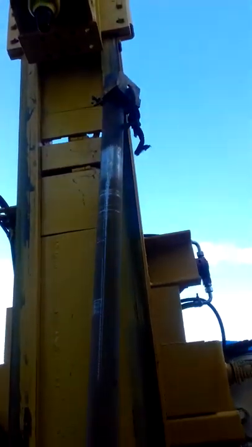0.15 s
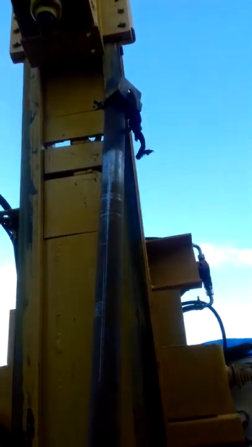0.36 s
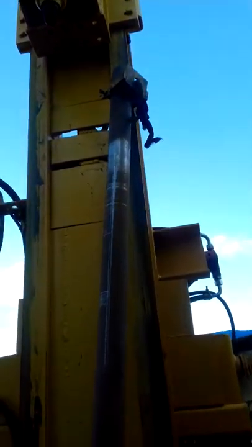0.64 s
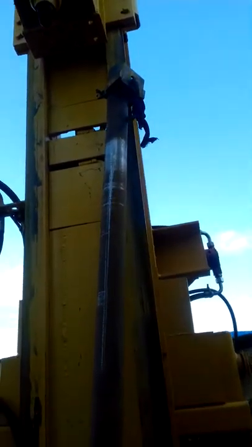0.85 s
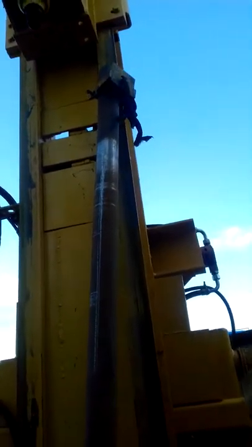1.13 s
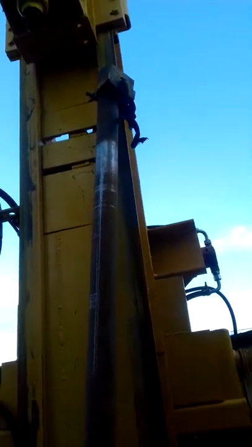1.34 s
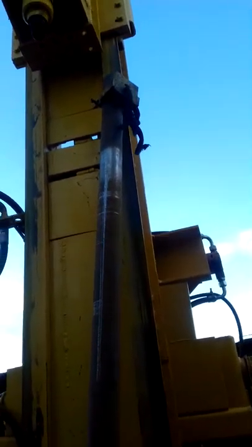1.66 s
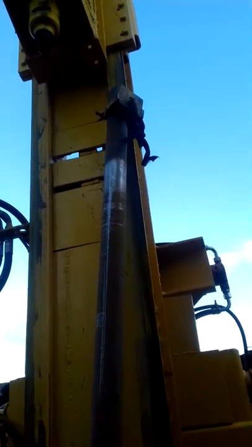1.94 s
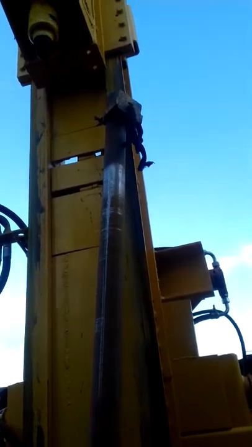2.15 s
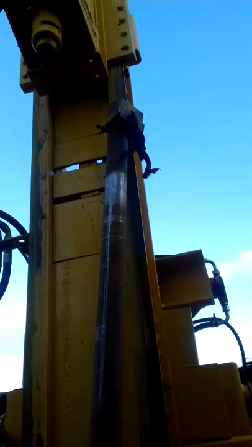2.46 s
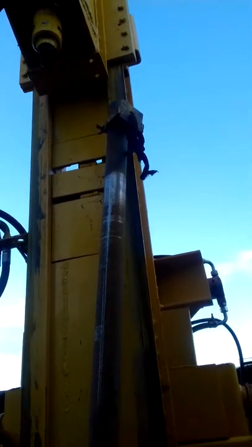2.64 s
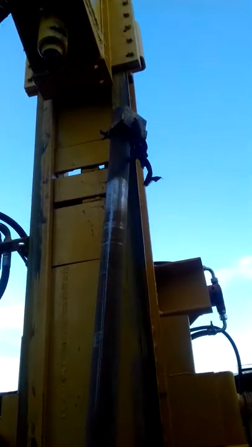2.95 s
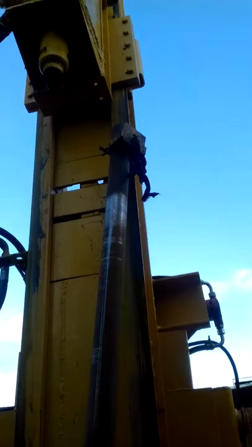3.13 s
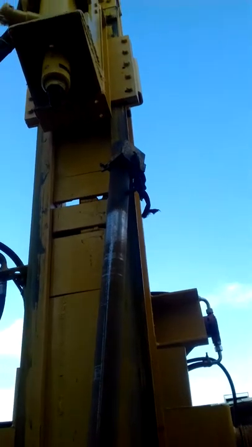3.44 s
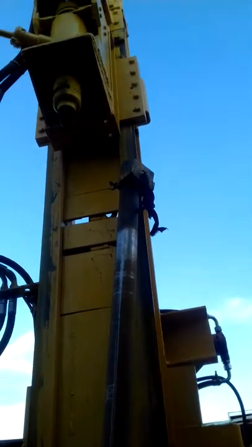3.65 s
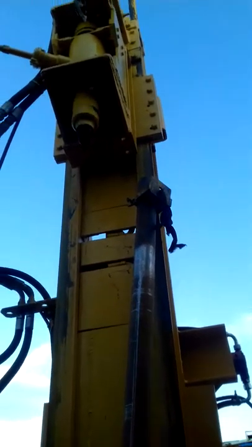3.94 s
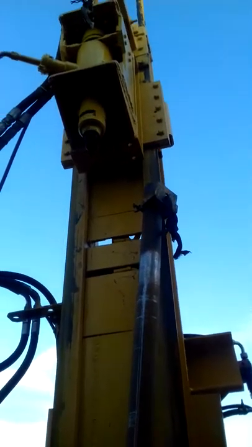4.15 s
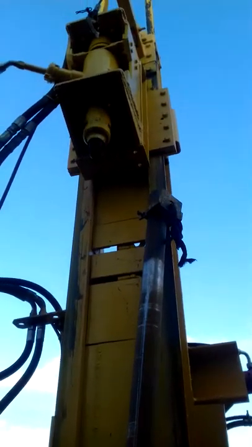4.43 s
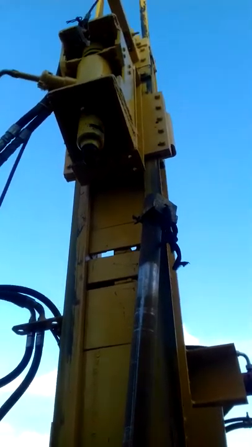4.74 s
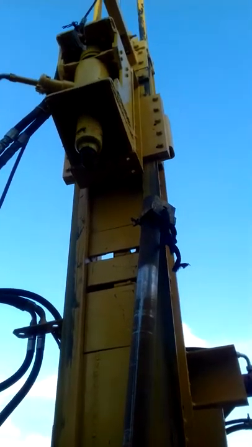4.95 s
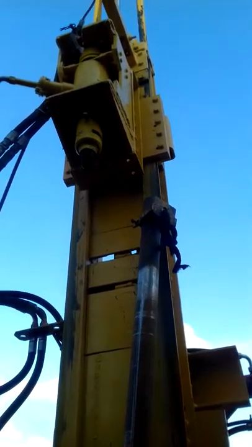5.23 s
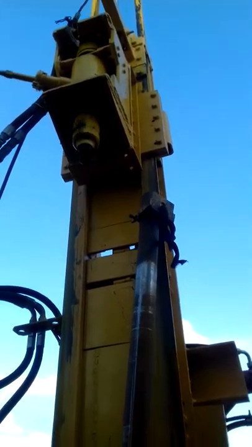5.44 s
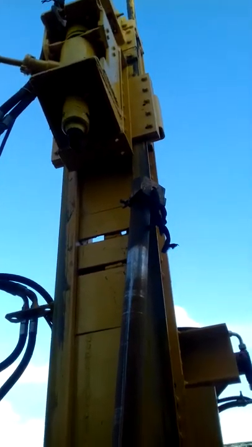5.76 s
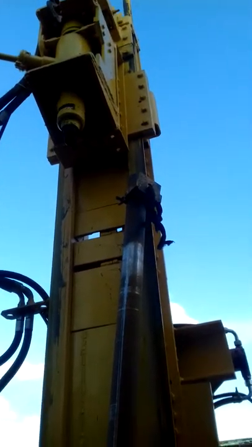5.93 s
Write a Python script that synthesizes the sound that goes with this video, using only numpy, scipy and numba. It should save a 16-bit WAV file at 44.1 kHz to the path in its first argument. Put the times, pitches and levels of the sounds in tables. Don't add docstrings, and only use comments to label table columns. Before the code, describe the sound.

A large diesel engine on a drilling rig is already running at full, steady speed from 0 s, loud and close in the open air, heard through a hand-held phone with little deep bass. The sound is a dense mid-range roar: rapid valve and gear clatter ringing in steel housing, rushing fan air, a steady pump hum and a cluster of sustained whines around one to two kilohertz. From about 0.1 to 0.6 s a wind gust thumps and flutters against the microphone; a shorter one comes at 0.8-1.1 s and a weaker one at 1.5-2.1 s. After that the drone dominates. Different whines swell and recede as the phone turns, notably around 1.2-3.2 s and again from 3.2 s onward, with the ring slightly fuller near 5.5 s. A very faint wind bump falls near 5.2 s. The engine never changes speed and ends abruptly around 6.1 s, still running.

```python
import sys
import numpy as np
from scipy import signal
from scipy.fft import rfft, irfft
from scipy.io import wavfile
from scipy.ndimage import map_coordinates
from numba import njit

SR = 44100
rng = np.random.default_rng(int(sys.argv[2]) if len(sys.argv) > 2 else 0)


def invert_db(x):
    u = np.asarray(x, float) / 20
    return 10 ** u


def dump(signal):
    limited = np.clip(np.atleast_2d(signal).T, -1, 1)
    pcm = np.round(limited * 32767).astype(np.int16)
    wavfile.write(sys.argv[1], SR, pcm)


N = 268567


def set_level(x, db):
    return x * invert_db(db) / np.sqrt(np.mean(x ** 2))


@njit
def bandpass(x, hz, width):
    y = np.empty(len(x))
    band, low = 0., 0.
    for i in range(len(x)):
        g = np.tan(np.pi * hz[i] / SR)
        damping = width / hz[i]
        v = (band + g * (x[i] - low)) / (1 + g * (g + damping))
        low = low + 2 * g * v
        band = 2 * v - band
        y[i] = damping * v
    return y


def over_time(table):
    t, *columns = np.transpose(table)
    return [np.interp(np.arange(N) / SR, t, column) for column in columns]


def over_hz(hz, table):
    f, *columns = np.transpose(table)
    return [np.interp(np.log(hz + 1), np.log(f), column) for column in columns]


def peaks_db(hz, table):
    return sum(db / (1 + (2 * (hz - f) / width) ** 2) for f, width, db in table)


def walk(rate):
    points = rng.standard_normal(int(N / SR * rate) + 2)
    return 1.4 * np.interp(np.arange(N) * (rate / SR), np.arange(len(points)), points)


def held(start, end, rise):
    t = np.arange(N) / SR
    return np.clip(np.minimum(t - start, end - t) / rise + .5, 0, 1)


def tones(cycle, orders, levels_db, sway_db, sway_rad):
    out = np.zeros(N)
    for order, db in zip(orders, levels_db):
        phase = 2 * np.pi * (order * cycle + rng.random()) + sway_rad * order * walk(1.504)
        swaying_db = db + sway_db * np.sqrt(order) * walk(1.313)
        out += np.sqrt(2) * invert_db(swaying_db) * np.sin(phase)
    return out


# start t/s, end t/s, rumble level/dB
GUSTS = [
    (.08, .58, -33),
    (0.837, 1.11, -31),
    (1.504, 2.102, -35.5),
]
GUST_RISE_S, GUST_FALL_DB_PER_S, BREEZE_DB = .06, 60.5, -39
# t/s, peak level/dB, centre f/Hz
BUFFETS = [(.118, -20, 170), (.151, -16, 480), (.158, -12, 140), (.183, -10, 330), (.2, -21, 240),
           (.273, -10, 520), (.278, -17, 130), (.291, -11, 360), (.34, -16, 290), (.361, -14, 450),
           (.413, -14, 330), (.432, -9, 390), (.448, -16, 240), (.481, -21, 190), (.517, -18, 180),
           (.549, -18, 200), (.56, -16, 370), (.572, -18, 170), (.876, -17, 240), (.893, -12, 160),
           (.97, -14, 270), (1.003, -21, 200), (1.026, -22, 190), (1.549, -23, 140), (1.577, -17, 270),
           (1.653, -18, 320), (1.746, -15, 190), (1.849, -17, 160), (1.893, -16, 130), (5.155, -24, 160)]
BUFFET_CYCLES, WAKE_S, WAKE_DB = 1.86, 0.032, -22.5


def wind_strength():
    t = np.arange(N) / SR
    blow = invert_db(BREEZE_DB) * held(0, GUSTS[-1][1], GUST_RISE_S)
    for start, end, db in GUSTS:
        falling_db = db - GUST_FALL_DB_PER_S * np.maximum(t - end, 0)
        blow = blow + held(start, np.inf, GUST_RISE_S) * invert_db(falling_db)
    for s, db, hz in BUFFETS:
        blow = blow + invert_db(db + WAKE_DB) * np.exp(-((t - s) / WAKE_S) ** 2)
    return blow


def eddy(t, db, hz):
    length = BUFFET_CYCLES / hz
    ragged = bandpass(rng.standard_normal(len(t)), np.full(len(t), 1. * hz), 1.6 * hz)
    thump = np.sin(2 * np.pi * (hz * t + rng.random())) * np.exp(-(t / length) ** 2)
    thump = thump + set_level(ragged, -8) * np.exp(-(t / (2.2 * length)) ** 2)
    return thump * invert_db(db + 1.0) / np.abs(thump).max()


def wind():
    centre = np.full(N, 220.)
    flutter = rng.standard_normal(N) * invert_db(2.0 * walk(29.03))
    rumble = bandpass(bandpass(flutter, centre, 340.0), centre, 450.0)
    out = set_level(rumble, 0) * wind_strength()
    t = np.arange(-2048, 2048) / SR
    for s, db, hz in BUFFETS:
        start = int(s * SR) - len(t) // 2
        out[start:start + len(t)] += eddy(t, db, hz)
    return signal.sosfilt(signal.butter(3, 1100, fs=SR, output="sos"), out)


# f/Hz, share [0-1], memory of the pattern [cycles]
REPEAT = [(150, .1, 90), (450, .6, 90), (1000, .72, 40), (2000, .65, 22), (3000, .5, 14), (5000, .28, 9),
          (9000, .15, 9)]


def fan_air():
    air_share = 1 - over_hz(np.fft.rfftfreq(N, 1 / SR), REPEAT)[0]
    return irfft(rfft(rng.standard_normal(N)) * np.sqrt(air_share), N)


def clatter(cycle, taken, size=8192):
    hz = np.arange(size // 2 + 1) * SPEED[0][1]
    share, memory = over_hz(hz, REPEAT)
    share[taken] = 0
    keep = np.exp(-1 / memory)
    rows = int(cycle[-1]) + 2
    pattern = rfft(rng.standard_normal((rows, size)))
    for row in range(1, rows):
        pattern[row] = keep * pattern[row - 1] + np.sqrt(1 - keep ** 2) * pattern[row]
    loops = irfft(pattern * np.sqrt(share) * (hz < SR / 2))
    knocks = map_coordinates(loops, [cycle, cycle % 1 * size], order=1, mode="grid-wrap")
    return knocks * np.sqrt(size * SPEED[0][1] / SR)


# f/Hz, spectral level/dB per Hz
COLOUR = [(30, -41), (70, -18), (125, -16.5), (300, -11), (600, -8.5), (1000, -2), (2000, -4), (2700, -13),
          (3150, -16.5), (4400, -11), (5200, -20), (6300, -26), (9000, -41), (12500, -59)]
# f/Hz, width [Hz], level/dB
HOUSING = [
    (410, 66, -4.5),
    (800, 350, -4),
    (2531, 390, 8),
    (3250, 300, -2),
    (987, 70, -6),
    (6150, 450, 3),
    (6770, 400, -2),
    (10760, 1100, 1.5),
]
# t/s, level/dB, centre f/Hz
RING = [
    (0, -22.5, 1560),
    (1.1, -25, 1590),
    (1.3, -24, 1580),
    (2.55, -21, 1634),
    (3.4, -23, 1590),
    (3.6, -23, 1590),
    (5.5, -20, 1547),
    (6.09, -22.5, 1600),
]
RING_WIDTH_HZ = 340
DRONE_DB, TREBLE_DB = -17.5, 2


def housing(x):
    ring_db, ring_hz = over_time(RING)
    hz = np.fft.rfftfreq(N, 1 / SR)
    spectrum = rfft(x) * invert_db(over_hz(hz, COLOUR)[0] + peaks_db(hz, HOUSING))
    treble = irfft(spectrum / (1 + (2000 / (hz + 1)) ** 6), N)
    treble_gain = invert_db(TREBLE_DB + 0.5 * walk(5.8))
    body = irfft(spectrum, N) + (treble_gain - 1) * treble
    ring = bandpass(x, ring_hz, 1. * RING_WIDTH_HZ)
    ring = bandpass(ring, ring_hz, 1.3 * RING_WIDTH_HZ)
    return set_level(body, DRONE_DB) + set_level(ring, -4.0) * invert_db(ring_db)


def fan(cycle):
    return tones(cycle, [50.13], [-40], sway_db=.25, sway_rad=.005)


# order [multiple of the cycle], level/dB with the phone aimed away
WHINES = [(96, -34), (120, -38), (128, -33), (136, -39), (141, -37), (142, -39), (144, -34), (145, -40),
          (146, -38), (150, -40), (153, -40), (160, -39), (161, -43), (182, -41), (216, -39)]
# order [multiple], start t/s, end t/s, gain level/dB
SWELLS = [(96, 0, 1.1, 4), (136, 0, .9, 10), (146, .2, 1, 8), (216, 0, .8, 4), (153, .4, 3.2, 8),
          (161, .9, 3.1, 14), (120, 1.1, 2.2, 3), (144, 1.15, 2.8, 8), (145, 1.15, 3.3, 10),
          (160, 1.2, 3.2, 7), (150, 1.15, 2.6, 15.5), (182, 2.2, 3.4, 7), (216, 2.4, 4.3, 5),
          (136, 3.2, 4.9, 10), (141, 3.2, 5.3, 6), (144, 3.4, 4.4, 9), (142, 3.6, 6.2, 7),
          (120, 4.4, 6.2, 7.5), (96, 4.6, 6.2, 5.5), (146, 4.8, 6.2, 9)]
TURN_S = .3
WHINE_ORDERS = [order for order, db in WHINES]


def whine_db(order, db):
    for which, start, end, gain in SWELLS:
        if which == order:
            db = db + gain * held(start, end, TURN_S)
    return db


def gear_whines(cycle):
    levels_db = [whine_db(order, db) for order, db in WHINES]
    return tones(cycle, WHINE_ORDERS, levels_db, sway_db=.07, sway_rad=.003)


STROKES_PER_CYCLE = 24
PUMP_STROKE_ORDERS = [1, 2, 3, 10, 11, 14, 15, 16, 17, 18, 19, 20, 30, 31, 32, 33]
PUMP_DB = [-33, -31, -38, -42, -49, -45, -46, -45, -45, -49, -52, -54, -67, -70, -71, -74]
PUMP_ORDERS = [STROKES_PER_CYCLE * order for order in PUMP_STROKE_ORDERS]


def pump(cycle):
    return tones(cycle, PUMP_ORDERS, PUMP_DB, sway_db=.16, sway_rad=.004)


BLOCK_ORDERS = [4, 8, 12, 14, 16, 18, 19, 21, 28, 34, 36, 37, 40, 46, 52, 60, 65, 68, 69, 70, 80, 81, 88,
                99, 174, 220]
BLOCK_DB = [-54, -33.5, -45, -48, -38, -44, -46, -46, -41, -46, -40, -39, -44, -45, -45, -45, -43, -43,
            -39.5, -41, -41, -42, -41, -40, -38, -38]


def firing(cycle):
    return tones(cycle, BLOCK_ORDERS, BLOCK_DB, sway_db=.25, sway_rad=.005)


# t/s, cycle rate f/Hz (one cycle is two crank turns)
SPEED = [(0, 11.046), (2, 11.053), (2.6, 11.044), (3.8, 11.046), (5.2, 11.037), (6.1, 11.042)]


def engine_cycle():
    return np.cumsum(over_time(SPEED)[0]) / SR


def scene():
    cycle = engine_cycle()
    taken = BLOCK_ORDERS + PUMP_ORDERS + WHINE_ORDERS
    noise = housing(clatter(cycle, taken) + fan_air())
    machine = fan(cycle) + gear_whines(cycle) + pump(cycle) + firing(cycle)
    return (wind() + noise + machine)[None]


def roll_off(x):
    return signal.sosfilt(signal.butter(12, 15720, fs=SR, output="sos"), x)


# f/Hz, width [Hz], level/dB
PORT = [(9930, 430, -9.5), (14950, 450, -27.5)]
HISS_DB, OPENS_S = -84.5, .0004


def record(dry):
    x = signal.sosfilt(signal.butter(2, 40, "high", fs=SR, output="sos"), dry)
    x = np.tanh(0.4 * x) / 0.4
    x = x + invert_db(HISS_DB) * rng.standard_normal(x.shape)
    x = irfft(rfft(x) * invert_db(peaks_db(np.fft.rfftfreq(N, 1 / SR), PORT)), N)
    x = x * held(OPENS_S, np.inf, 2 * OPENS_S)
    return roll_off(x)


dry = scene()
out = record(dry)
dump(out)
```